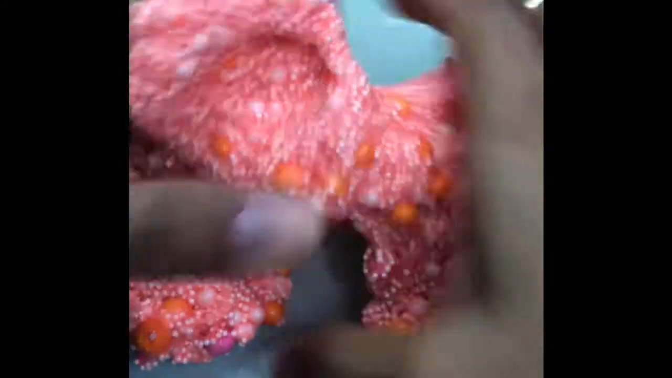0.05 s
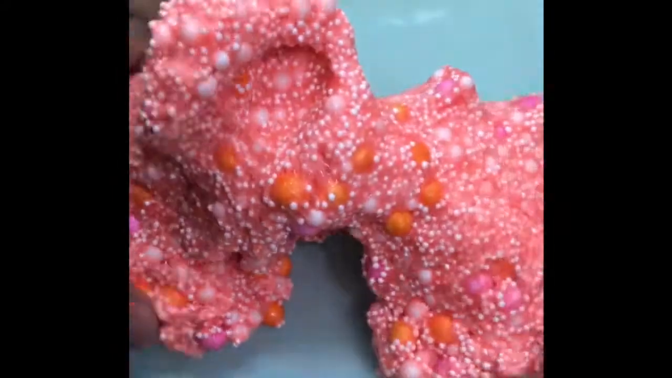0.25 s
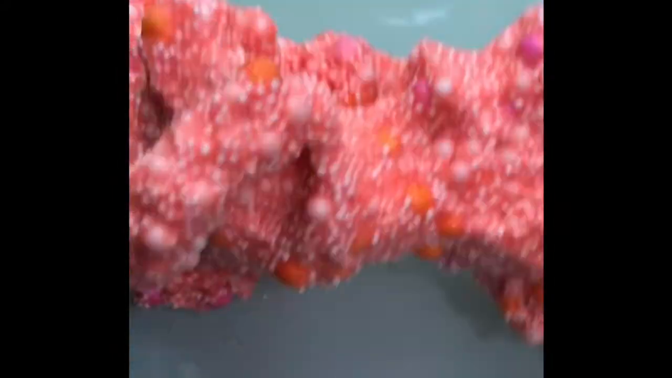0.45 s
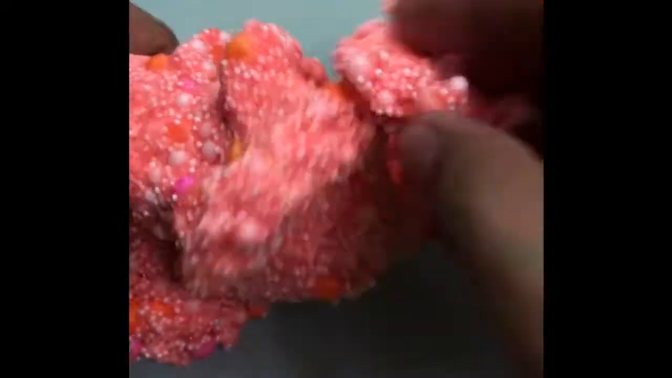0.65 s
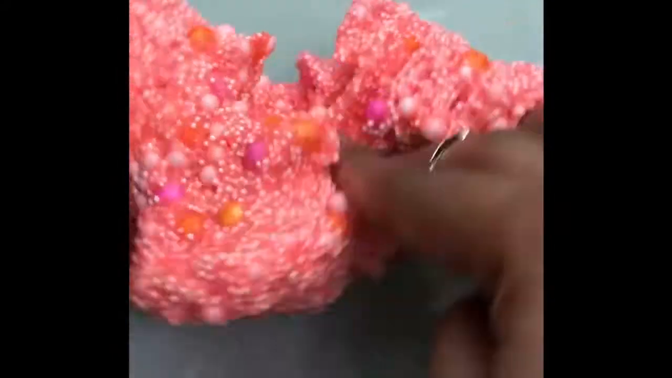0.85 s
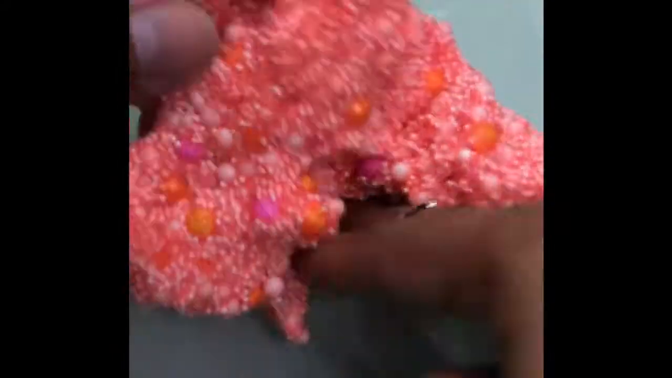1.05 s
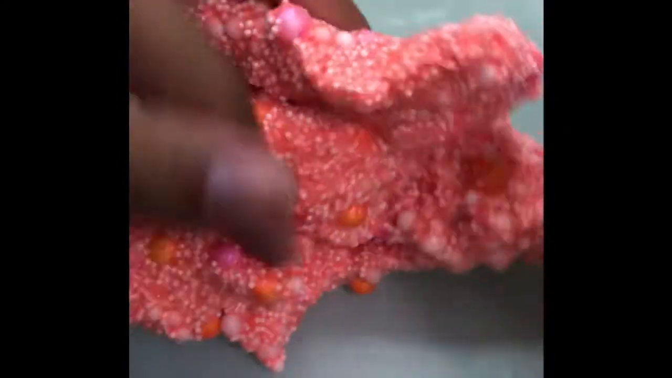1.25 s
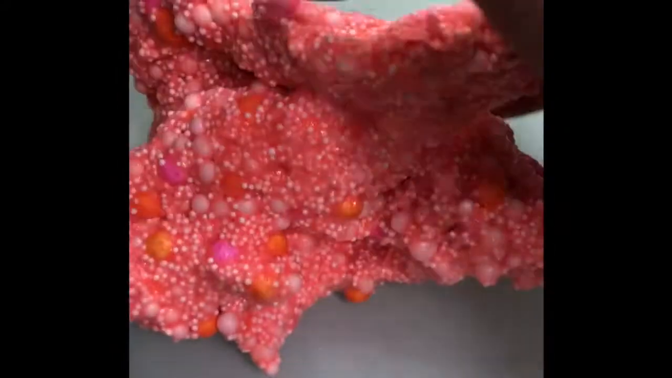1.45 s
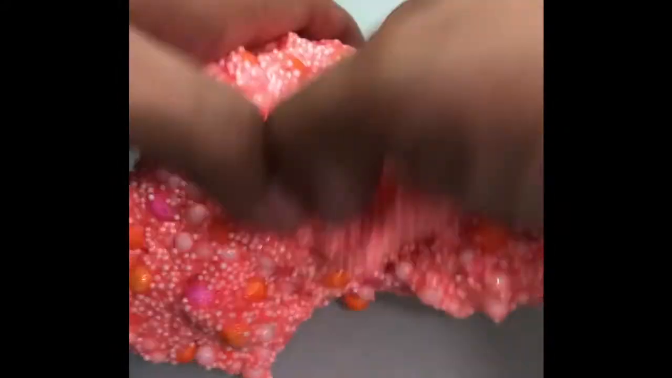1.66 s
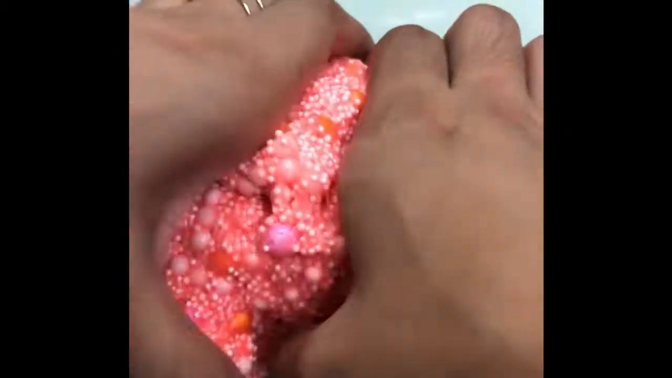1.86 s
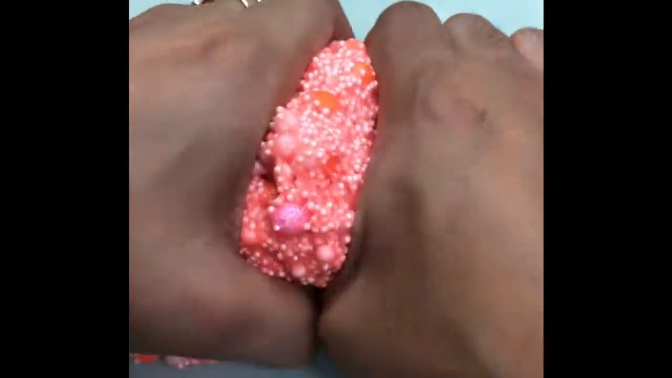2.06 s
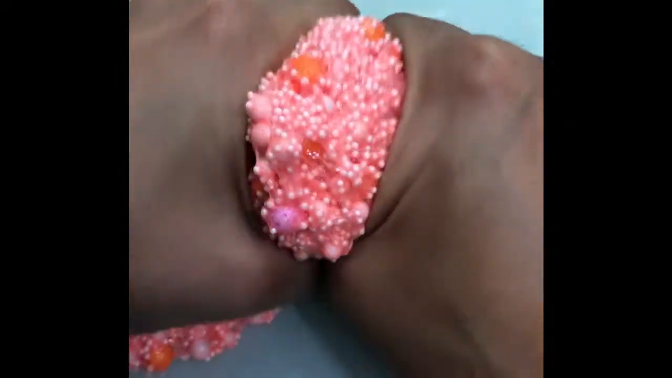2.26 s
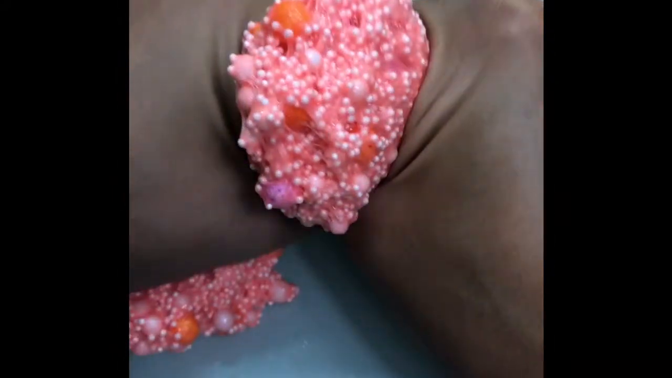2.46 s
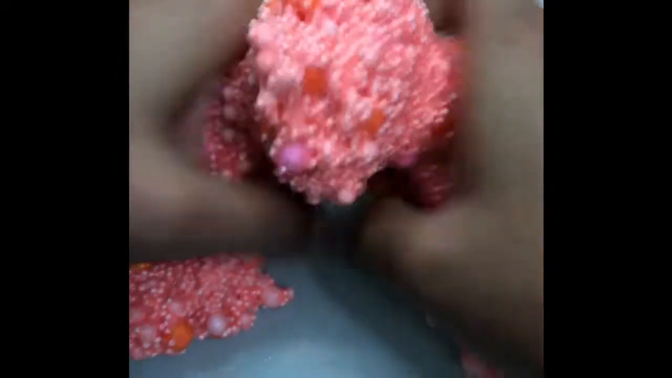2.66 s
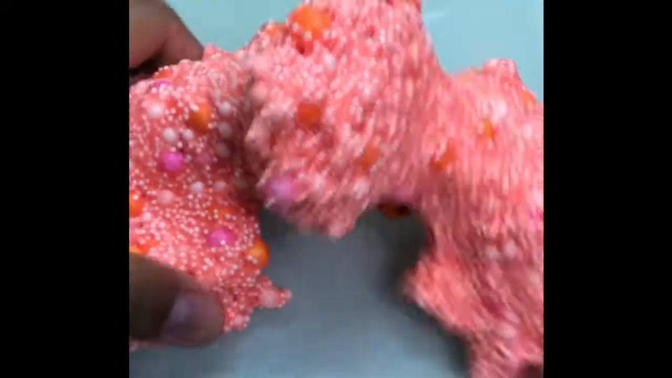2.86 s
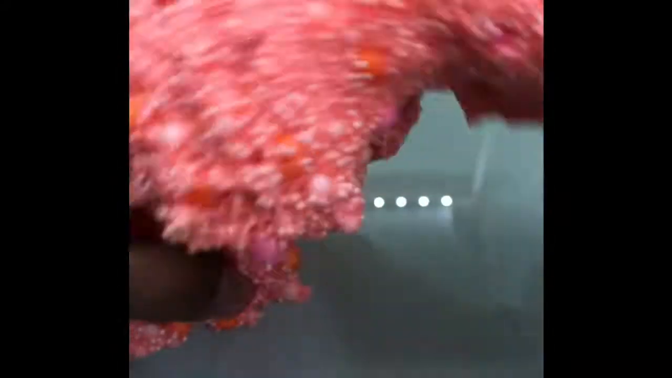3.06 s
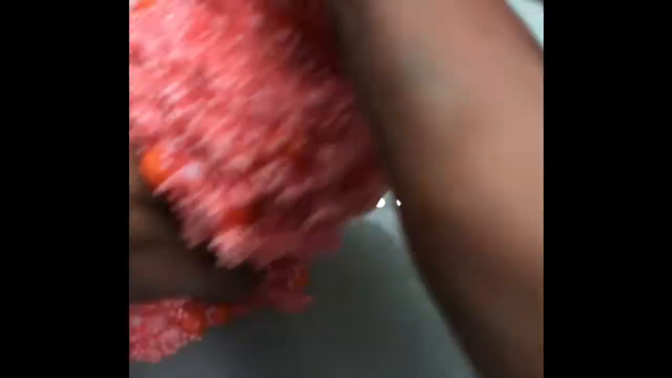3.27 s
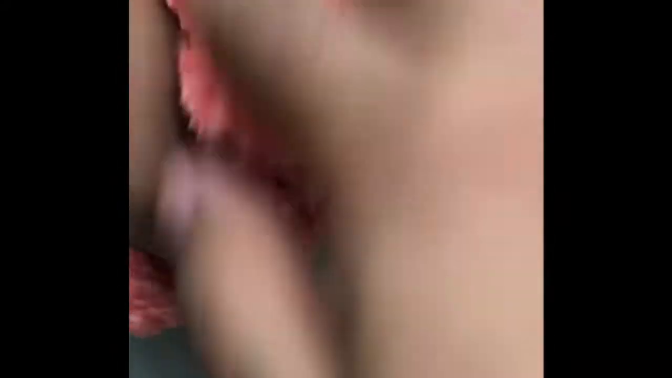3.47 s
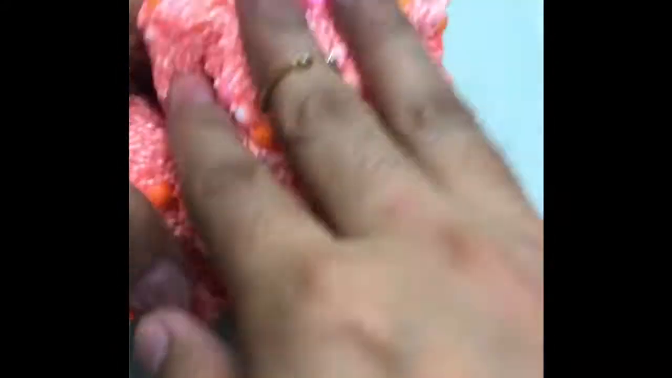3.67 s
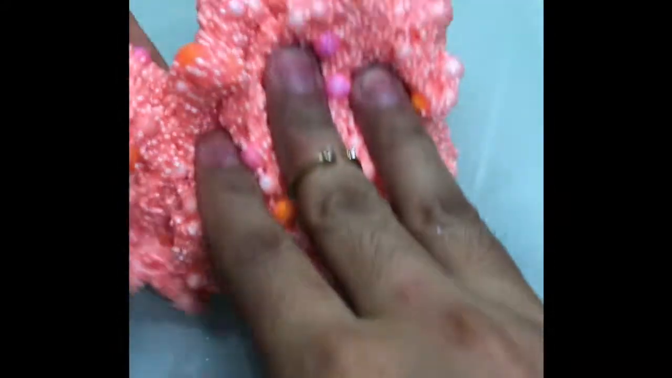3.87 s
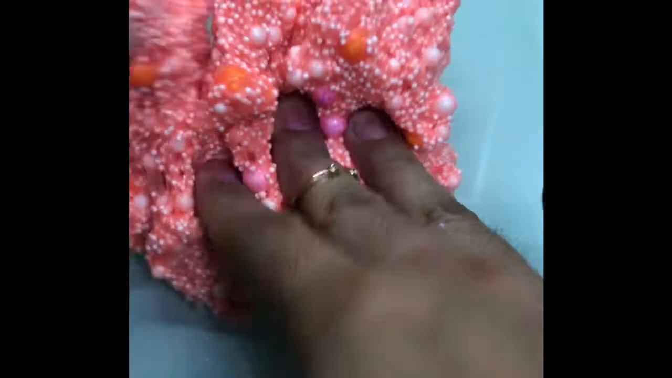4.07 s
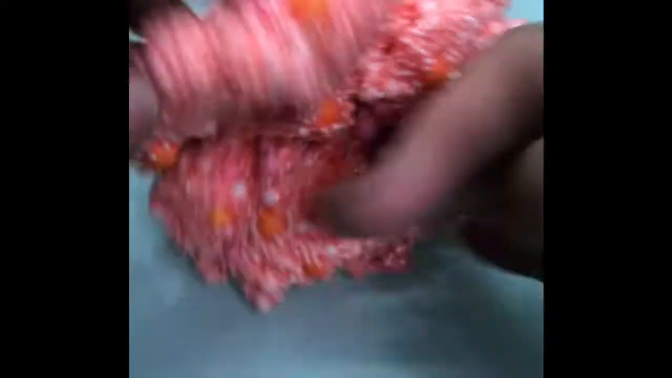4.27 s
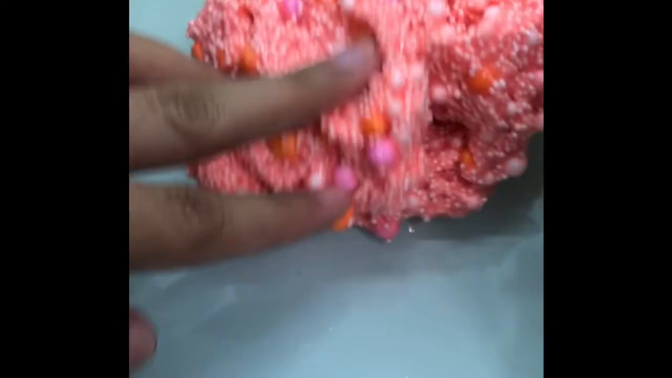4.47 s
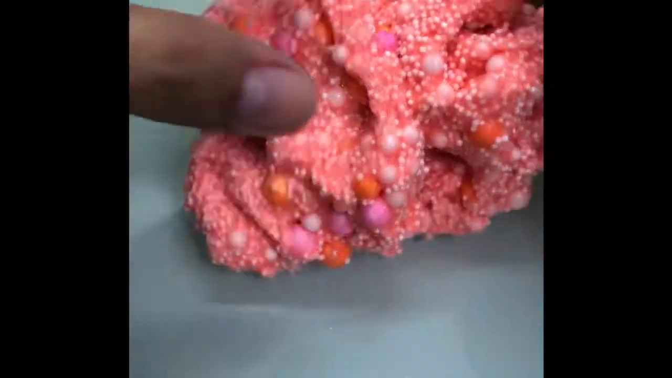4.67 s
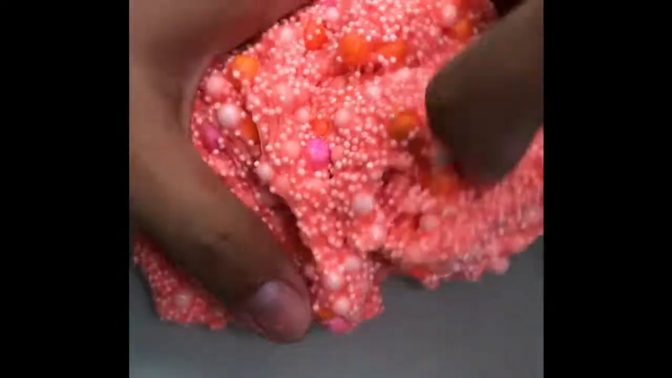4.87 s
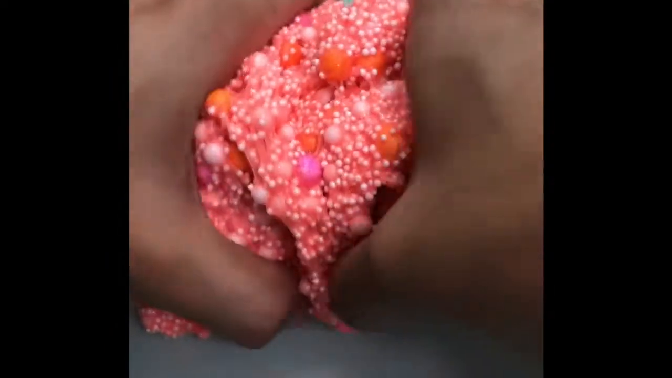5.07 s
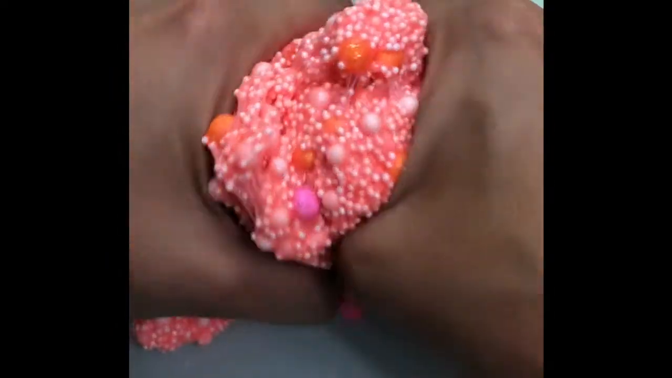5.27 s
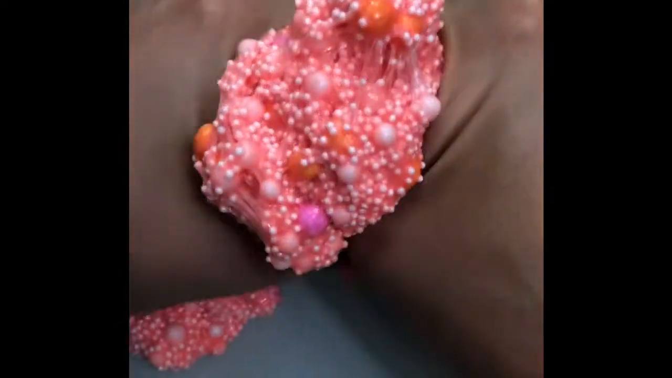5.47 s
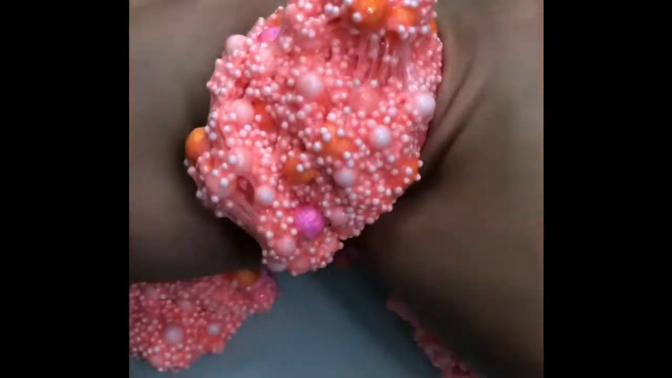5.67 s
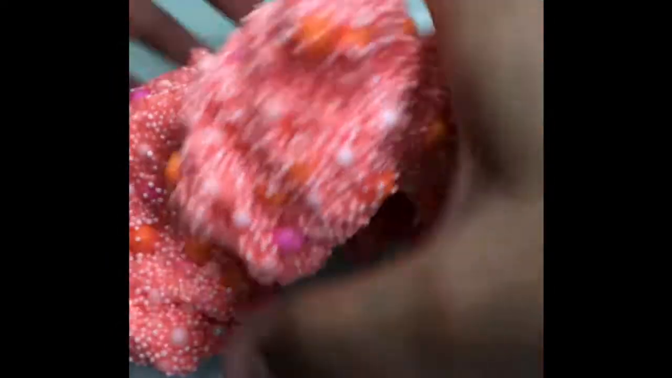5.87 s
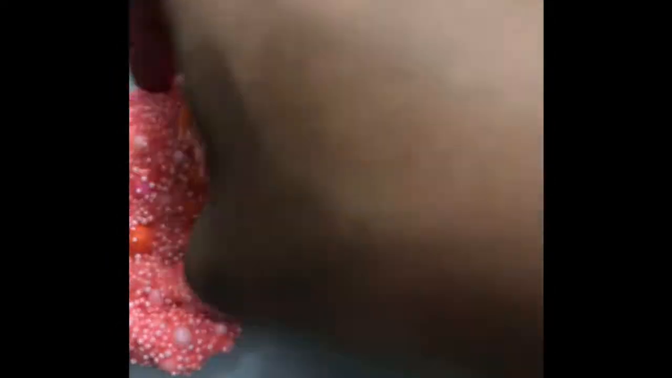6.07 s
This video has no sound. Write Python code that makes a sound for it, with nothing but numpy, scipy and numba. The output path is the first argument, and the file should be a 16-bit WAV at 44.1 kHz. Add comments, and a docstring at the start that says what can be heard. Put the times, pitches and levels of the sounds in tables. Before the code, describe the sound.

Close, dry sound of crunchy foam-bead slime being kneaded on a table. It starts at once with a fizzy crackle and a low scuff, eases to scattered snaps, swells into a long popping squeeze, and falls to sparse ticking with a barely audible wavering squeak. A second crushing swell brings the sharpest pops, then fades. Quiet indoor background with a steady soft low rumble.

```python
"""A dense, bright crackle opens the scene as two hands knead foam-bead slime, close up in a quiet room.
Sticky bonds between beads snap as random impulses, each exciting a bright film and a hollow gap.
Palms scuff by stick-slip friction, the lump bumps the table's modes, and trapped air pockets pop.
A few decaying sines ring and faint wavering tones squeal; echo, short tail and low rumble form the room."""
import sys
import numpy as np
from scipy import signal
from scipy.fft import rfft, irfft
from scipy.io import wavfile
from scipy.ndimage import uniform_filter1d
from numba import njit

SR = 44100
rng = np.random.default_rng(int(sys.argv[2]) if len(sys.argv) > 2 else 0)


def to_wav(sig):
    """Store sig (one row per channel, or 1-D mono) as 16-bit WAV at the path in sys.argv[1].

    Samples outside -1..1 are clipped; the rate is SR.
    """
    pcm = np.clip(np.atleast_2d(sig), -1, 1) * 32767
    pcm = np.round(pcm).astype(np.int16)
    wavfile.write(sys.argv[1], SR, pcm.T)  # frames by channels


N = 269892
TIME = np.arange(N) / SR
CUT_HZ = 15850  # upper limit of the sound


def undb(db):
    """Logarithmic level: decibels become an amplitude gain."""
    return 10 ** (np.asarray(db) / 20)


def add(track, s, sound):
    """Superposition: lay a sound into the track at time s."""
    i = int(np.clip(s * SR, 0, N - 1))
    track[i:i + len(sound)] += sound[:N - i]


def colour(x, points):
    """Minimum-phase filtering: a causal response through (frequency_hz, gain_db) points."""
    size = 4096
    hz, db = np.transpose(points)
    bins_hz = np.arange(size // 2 + 1) * SR / size
    gain_db = np.interp(np.log(bins_hz + 1), np.log(hz), db)
    # folding the cepstrum onto positive times makes the response causal
    cepstrum = irfft(np.log(undb(gain_db)))
    cepstrum[1:size // 2] *= 2
    cepstrum[size // 2 + 1:] = 0
    response = irfft(np.exp(rfft(cepstrum)))
    return signal.fftconvolve(x, response)[:len(x)]


def resonate(x, hz, width_hz):
    """Resonance: one peak whose sharpness is its frequency over its bandwidth."""
    hz = min(hz, .45 * SR)
    return signal.lfilter(*signal.iirpeak(hz, hz / width_hz, fs=SR), x)


def mode(t, hz, t60):
    """Damped free vibration: a sine that falls 60 dB in t60 seconds."""
    return np.sin(2 * np.pi * hz * t) * np.exp(-np.log(1000) * t / t60)


def even(x, span_s):
    """Level normalisation: bring the running rms to 1, keeping the fast detail."""
    size = int(span_s * SR)
    power = uniform_filter1d(uniform_filter1d(x * x, size), size)
    return x / np.sqrt(power.clip(1e-12))


def snaps(rate, spread_db, ceiling):
    """Random impulse process: clicks at a moving rate per second, many faint and a few strong."""
    happens = rng.random(N) < rate / SR
    strength = np.minimum(rng.exponential(size=N), ceiling)
    return happens * undb(spread_db * strength) * rng.choice([-1, 1], N)


# spectrum of the low, steady room rumble: frequency_hz [Hz], gain_db [dB]
ROOM_COLOUR = [(20, -5.5), (45, 1.5), (90, -10), (300, -14), (450, -22), (680, -17.5), (1100, -26.5),
               (3000, -29), (16000, -30)]
ROOM_DB = -55  # rms level


def room_air():
    """Broadband noise: a random signal weighted toward the bass gives a steady rumble."""
    air = colour(rng.standard_normal(N), ROOM_COLOUR)
    return air * undb(ROOM_DB) / air.std()


REST_DB = -65.5  # the lump still ticks when left alone
FADE_SHAPE = 1.4  # attack and release each span 20 dB and steepen as the hand loses contact


def swells(rows):
    """Energy summation: overlapping attacks, holds and releases add in power; returns dB."""
    total = undb(REST_DB) ** 2
    for s, hold_s, db, attack_s, release_s in rows:
        before = np.maximum(s - TIME, 0) / attack_s
        after = np.maximum(TIME - s - hold_s, 0) / release_s
        away = np.minimum(before + after, 10)
        total = total + undb(db - 20 * away ** FADE_SHAPE) ** 2
    return 10 * np.log10(total)


# the hollows lie HOLLOW_DB under the snaps at a firm grip, and change HOLLOW_SLOPE dB per dB of crackle
FIRM_DB, HOLLOW_DB, HOLLOW_SLOPE = -41, -12, 0.97
GRIP_RUB_DB = -17.5  # skin rubs during every squeeze, relative to the hollows
# the lump drags on after each bump, relative to the bump
SETTLE_DB, SETTLE_ATTACK_S, SETTLE_RELEASE_S = -14, 0.0055, 0.069
# fingers squeeze, fold or pull the lump:
# full_grip_s [s], hold_s [s], crackle_db [dB], attack_s [s], release_s [s]
SQUEEZES = [(0.0, 0.06675, -27, .02, 0.03949), (0.245, 0.067, -29.5, 0.031, .13),
            (0.315, 0.021, -28.5, .03, 0.044), (0.49, 0.21, -42.5, 0.046, .2),
            (0.875, 0.013, -32.5, 0.27, 0.24), (1.1, 0.32, -42.5, 0.07085, 0.046),
            (1.195, 0.016, -32.5, 0.03, 0.027), (1.71, 0.16, -33.5, .14, 0.0841),
            (1.975, 0.044, -25.5, 0.08, 0.11), (2.15, 0.3, -28, 0.17, 0.15),
            (2.64, 0.083, -27, 0.077, 0.043), (2.862, 0.00959, -28.5, 0.022145, 0.098),
            (2.95, 0.39, -42.5, .05, .2), (3.47, 0.055, -34, 0.15, 0.49), (3.75, 0.71, -41.5, .1, 0.18),
            (3.885, 0.02, -34.5, 0.028, 0.16), (4.475, 0.00713, -37.5, .08, .06),
            (4.6, 0.032, -41, 0.035, 0.021), (4.84, .14, -41, 0.18, .1), (5.05, .49, -29, 0.16, 0.11),
            (5.24, .06, -29.5, 0.18, 0.27), (5.72, 0.079, -28, 0.086, 0.12),
            (6.08, 0.01183, -43, 0.076, 0.0353)]
# palms slide over the lump:
# full_speed_s [s], hold_s [s], scuff_db [dB], attack_s [s], release_s [s]
SLIDES = [(0.0, 0.037, -35, .02, 0.085), (0.34, 0.054, -44.5, 0.2, 0.14),
          (1.99, 0.0999, -51.5, 0.31, 0.2423), (2.67, 0.031, -37.5, 0.066, 0.094),
          (5.75, 0.069, -39.5, 0.084, 0.076)]


def hands():
    """Common excitation: the movements set the levels in dB of bright snaps, hollows and sliding."""
    snap_db = swells(SQUEEZES)
    body_db = FIRM_DB + HOLLOW_DB + HOLLOW_SLOPE * (snap_db - FIRM_DB)
    settling = [(s + SETTLE_ATTACK_S, 0, db + SETTLE_DB, SETTLE_ATTACK_S, SETTLE_RELEASE_S)
                for s, db, _ in BUMPS]
    moving = undb(swells(list(SLIDES) + settling))
    rubbing = undb(body_db + GRIP_RUB_DB)
    return snap_db, body_db, 20 * np.log10(np.hypot(moving, rubbing))


@njit
def cavities(clicks, hz, q):
    """Impulse response of resonators: every click rings a cavity of its own pitch for a few cycles."""
    out = np.zeros(len(clicks))
    for i in range(len(clicks)):
        if clicks[i] != 0:
            turn = 2 * np.pi * hz[i] / SR
            loss = turn / q / 2
            keep = np.exp(-loss)
            spring = 2 * keep * np.cos(turn)
            now, before = clicks[i] * loss * np.sin(turn), 0.
            # each ring ends once it has decayed to one percent
            for j in range(i, min(i + int(4.6 / loss), len(out))):
                out[j] += now
                now, before = spring * now - keep * keep * before, now
    return out


# spectrum of the hollows, for crackle and pops: frequency_hz [Hz], gain_db [dB]
BODY_COLOUR = [(100, -17), (400, -7.5), (750, 1), (1300, -1.5), (2100, 3.5), (3200, 4.5), (6000, 2),
               (9000, 0), (16000, -81.5)]


def crackle(snap_db, body_db, slide_db, fine_db=-13, slide_fine_db=0.33, spread_db=3.0, tear_db=-6,
            film_hz=12000, film_q=3.5, hollow_q=5.104, scatter_db=5, mush_db=-8, patchy_db=4.0,
            shear_db=-3):
    """Impulsive fracture: bonds snap faster under a harder squeeze, exciting bright films and hollows."""
    rate = 600 * undb(.4 * (snap_db + 40.0))  # snaps per second
    clicks = even(snaps(rate, spread_db, ceiling=4.23), 0.15)
    # one snap tears its neighbours loose within a millisecond or so
    tear_s = .001
    keep = np.exp(-1 / (tear_s * SR))
    tearing = np.sqrt(signal.lfilter([1 - keep], [1, -keep], clicks ** 2)) * undb(tear_db)
    # a sliding palm shears countless bonds at once, so the crackle blurs into a hiss
    fine = undb(fine_db + slide_fine_db * np.maximum(slide_db - REST_DB, 0))
    swarm = snaps(7000, 1.6, ceiling=2)
    swarm = swarm / swarm.std()
    # the lump gives way patch by patch, so the snaps come in bunches
    patch_rate = 45  # per second
    patch_luck = np.interp(TIME * patch_rate, np.arange(N), rng.standard_normal(N))
    patch = undb(patchy_db * patch_luck)
    clicks = (clicks + (tearing + fine) * swarm) * patch
    films = np.minimum(film_hz * 2 ** (0.2 * rng.standard_normal(N)), CUT_HZ)
    snap = np.diff(cavities(clicks, films, film_q), prepend=0)  # a tiny film radiates no bass
    # bonds buried deep in the lump are heard only through their hollows, as a soft mush
    hollows = np.exp(rng.uniform(np.log(600), np.log(8000), N))
    scatter = undb(scatter_db * rng.standard_normal(N))
    buried = undb(mush_db) * swarm * patch
    body = cavities((clicks + buried) * scatter, hollows, hollow_q)
    body = even(colour(body, BODY_COLOUR), 0.095)
    # sliding while squeezing opens more hollows
    opened = np.hypot(undb(body_db), undb(np.minimum(slide_db, body_db) + shear_db))
    return even(snap, 0.083) * undb(snap_db - 1.46) + body * opened


# modes of the table under the soft lump, for slides and bumps:
# pitch_hz [Hz], t60_s [s], level_db [dB, relative]
TABLE = [(42.45, 0.2, -7.5), (68, 0.088, -3.5), (133.4, 0.083, -0.5), (200, 0.06476, -1),
         (294.7, 0.1, -0.5), (360, 0.023, 3), (658, 0.05, 5)]
# spectrum of the scuff: frequency_hz [Hz], gain_db [dB]
SLIDE_COLOUR = [(30, 3.5), (340, -2.5), (520, -3.5), (950, -11), (6000, -35)]
# wet squelch between palm and slime: pitch_hz [Hz], width_hz [Hz], level_db [dB, relative]
SQUELCH = [(626, 570, 4), (1107.2, 210, -1), (1953, 180, 7)]


def sliding(body_db, slide_db, squelch_db=-1, table_db=6):
    """Stick-slip friction: slips scuff and hum in the table, and squelch when the lump is crushed too."""
    slips = snaps(1500, 2.8, ceiling=3.064)
    hum = np.zeros(N)
    for hz, t60, db in TABLE:
        width_hz = np.log(1000) / np.pi / t60
        hum += undb(db + table_db) * resonate(slips, hz, width_hz)
    scuff = even(colour(slips + hum, SLIDE_COLOUR), 0.018) * undb(slide_db)
    squelch = np.zeros(N)
    for hz, width_hz, db in SQUELCH:
        squelch += undb(db) * resonate(resonate(slips, hz, width_hz), hz, 2 * width_hz)
    return scuff + even(squelch, 0.021) * undb(np.minimum(slide_db, body_db) + squelch_db)


# the lump bumping the table: start_s [s], level_db [dB, peak], contact_ms [ms]
BUMPS = [(0.192, -33.5, 3.75), (0.354, -35.5, 5), (0.399, -36, 2.1), (1.046, -34, 5.7), (1.213, -32, 7.4),
         (1.561, -36.5, 2.4), (1.8691, -24.5, 0.66), (2.044, -38, 8.7), (2.765, -38, 3.5),
         (2.855, -38.5, 1.7), (4.686, -39.5, 2.5), (4.708, -38.5, 10.635), (5.835, -35, 3.5)]


def table_bumps():
    """Modal excitation: a longer contact sounds duller, and each bump favours other table modes."""
    out, t = np.zeros(N), TIME[:SR // 3]
    for s, db, contact_ms in BUMPS:
        push = np.sin(np.pi * np.minimum(t * 10 ** 3 / contact_ms, 1)) ** 2
        ring = np.zeros(len(t))
        for k, (hz, t60, mode_db) in enumerate(TABLE):
            gain = undb(mode_db + 2 * rng.standard_normal())
            ring += gain * (-1) ** k * mode(t, hz, t60)
        bump = signal.fftconvolve(push, ring)[:len(t)]
        add(out, s, bump * undb(db) / np.abs(bump).max())
    return out


# the air pockets that stand out as they burst, levels as rms over 5 ms:
# start_s [s], snap_db [dB], body_db [dB], pitch_hz [Hz, of the snap], tear_ms [ms, at least 0.05 is used]
POPS = [(0.3206, -27, -27, 14000, 0.86), (0.3994, -16, -61, 11450, 0.027), (0.467, -29, -52, 13700, 0.46),
        (0.6871, -26, -43.5, 12200, .1), (0.8229, -26, -56, 14000, 1.278), (0.8932, -23.5, -44, 13600, .6),
        (0.932, -47, -39.5, 12100, .3), (1.191, -19.5, -57, 14800, 0.3375),
        (1.208, -22.5, -34.5, 12300, 5.9), (1.7147, -20, -29, 10800, 0.45),
        (1.8101, -29, -39.5, 11300, 0.19), (1.8721, -34, -33, 13200, 0.98),
        (1.9707, -19.5, -30, 13000, 0.1673), (2.0092, -20.5, -19, 8051, 0.41),
        (2.0658, -16.5, -36.5, 13600, 0.041), (2.1801, -18, -31, 11400, 0.1458),
        (2.2171, -22, -26.5, 11100, 0.13), (2.321, -14, -22, 12800, 4.2),
        (2.3735, -16, -38.5, 13340, 0.2698), (2.4063, -18, -29, 13100, 1.9),
        (2.4406, -17, -52, 12990, 4.39), (2.4821, -23.5, -26, 12500, 4.725), (2.735, -21, -37, 12800, 3.2),
        (2.8293, -36.5, -53, 12500, 0.72), (2.8592, -19.5, -51.5, 14100, 2),
        (2.9333, -23, -31.5, 5960, 0.21), (2.974, -28.5, -61.5, 13000, .25), (3.235, -25, -49, 12800, .1),
        (3.4993, -27, -34, 12400, 0.49), (3.7356, -14.5, -44.5, 14200, 0.45),
        (4.3373, -31.5, -50, 10500, .3), (4.418, -34, -40.5, 11200, 0.38), (4.4865, -26, -44, 14000, 1.2),
        (4.5032, -33, -50, 11000, .1), (4.53, -31.5, -38, 12600, 1.9), (4.8771, -28.5, -50, 11700, .1),
        (5.0653, -26, -30.5, 11500, 0.49), (5.123, -20.5, -29.5, 12300, 0.33), (5.221, -18, -45, 13140, .1),
        (5.2362, -13, -43, 12700, 0.19), (5.251, -13.5, -25.5, 13000, 0.69),
        (5.3072, -11, -32, 12700, 0.095), (5.3191, -11.5, -29, 9800, 0.23),
        (5.4036, -17.5, -24.5, 8000, 2.107), (5.4779, -21.5, -50, 12900, .4),
        (5.4995, -16, -41, 12700, 1.9), (6.1016, -24.5, -37, 11200, 1.1)]


def pops(rows, width_hz=5000, edge=1.83, pocket_hz=2500):
    """Cavity release: a tearing film snaps brightly and excites the hollow knock of its air pocket."""
    out, t = np.zeros(N), TIME[:SR // 50]
    span = SR // 200  # 5 ms, over which the levels are rms
    impulse = 1. * (t == 0)
    pocket = resonate(colour(impulse, BODY_COLOUR), pocket_hz, 3 * pocket_hz)
    for s, snap_db, body_db, hz, tear_ms in rows:
        # the film rips in uneven jerks after the first break
        jerks = rng.standard_normal(len(t)) * rng.exponential(size=len(t))
        tear = edge * impulse + jerks * np.exp(-t * 10 ** 3 / max(tear_ms, 1 / 20))
        snap = resonate(resonate(tear, hz, width_hz), hz, width_hz)
        body = signal.fftconvolve(tear, pocket)
        for part, db in (snap, snap_db), (body, body_db):
            add(out, s, part * undb(db) * np.sqrt(span / np.sum(part ** 2)))
    return out


# lesser pockets: bursts per second, snap and hollow levels over the crackle's, and their scatter
STRAY_PER_S, STRAY_SNAP_DB, STRAY_BODY_DB, STRAY_SPREAD_DB = 12, 4.5, 4, 4
STRAY_LIMIT_DB = -30  # none of them snaps louder
# the pitch of their snaps, its scatter, and the middle tearing time
STRAY_HZ, STRAY_OCTAVES, STRAY_TEAR_MS = 12300, 0.23, 0.38


def stray_pops(snap_db, body_db):
    """Random point process: rows of lesser pops, as strong as the squeeze of the moment allows."""
    rows, tries = [], 200
    for when, chance, *dice in rng.random((tries, 10)):
        if chance < STRAY_PER_S * N / SR / tries:
            i = int(when * N)
            # differences of two dice cluster around zero
            luck = 2 * (np.array(dice[::2]) - dice[1::2])
            snap_luck, body_luck, pitch_luck, tear_luck = luck
            snap = snap_db[i] + STRAY_SNAP_DB + STRAY_SPREAD_DB * snap_luck
            body = body_db[i] + STRAY_BODY_DB + STRAY_SPREAD_DB * (snap_luck + body_luck)
            excess = max(snap - STRAY_LIMIT_DB, 0)
            hz = STRAY_HZ * 2 ** (STRAY_OCTAVES * pitch_luck)
            tear_ms = STRAY_TEAR_MS * 2 ** tear_luck
            rows.append((i / SR, snap - excess, body - excess, hz, tear_ms))
    return rows


# short pitched rings: start_s [s], pitch_hz [Hz], t60_s [s], level_db [dB]
RINGS = [(1.802, 1627, 0.33, -37.5), (2.062, 354.4, 0.14, -41), (2.8585, 1900, 0.031, -23.5)]


def rings():
    """Exponential decay: a few brief sines start at once and die away."""
    out = np.zeros(N)
    for s, hz, t60, db in RINGS:
        add(out, s, undb(db) * mode(TIME[:SR // 2], hz, t60))
    return out


# faint pitched squelch and whistle, level before the swell and fade:
# start_s [s], length_s [s], pitch_hz [Hz], width_hz [Hz], level_db [dB, rms], roughness [0-1]
SQUEALS = [(4.162, 0.153, 682, 356.4, -53.5, 0.58), (4.239, .8, 2057, 60, -62.5, 0.57)]


def squeals(waver=0.012):
    """Frequency and amplitude modulation: narrow tones waver and flutter as they swell and fade."""
    out = np.zeros(N)
    for s, length_s, hz, width_hz, db, rough in SQUEALS:
        size = int(length_s * SR)
        drift = signal.resample(rng.standard_normal(20), size)
        flutter = signal.lfilter(*signal.butter(1, width_hz / SR), rng.standard_normal(size))
        strength = 1 - rough + rough * flutter / flutter.std()
        phase = 2 * np.pi * np.cumsum(hz * (1 + waver * drift)) / SR
        squeal = strength * np.sin(phase)
        add(out, s, signal.windows.tukey(size) * squeal * undb(db) / squeal.std())
    return out


def room(x, echo_s=0.0038, echo_db=-17, tail_db=-18, t60=0.44):
    """Reflection and reverberation: the tabletop returns a quick echo, the walls a faint short tail."""
    t = TIME[:SR // 2]
    response = rng.standard_normal(len(t)) * np.exp(-np.log(1000) * t / t60)
    response *= undb(tail_db) / np.sqrt(np.sum(response ** 2))
    response[0] = 1  # direct sound
    add(response, echo_s, undb([echo_db]))
    return signal.fftconvolve(x, response)[:N]


def scene():
    """Superposition: slime and table sound in the room, over its low steady rumble."""
    air = room_air()
    snap_db, body_db, slide_db = hands()
    kneading = crackle(snap_db, body_db, slide_db) + sliding(body_db, slide_db)
    bumps = table_bumps()
    bursts = pops(list(POPS) + stray_pops(snap_db, body_db))
    tones = rings() + squeals()
    return (room(kneading + bumps + bursts + tones) + air)[None]


def record(dry):
    """Saturation and band limiting: the recorder clips at full scale and cuts the top."""
    low_pass = signal.ellip(10, .2, 70, CUT_HZ, fs=SR, output="sos")
    return signal.sosfilt(low_pass, np.clip(dry, -1, 1))


dry = scene()
out = record(dry)
to_wav(out)
```